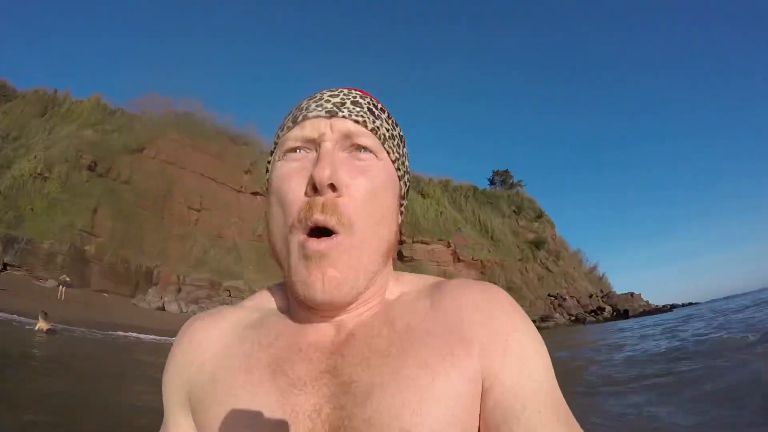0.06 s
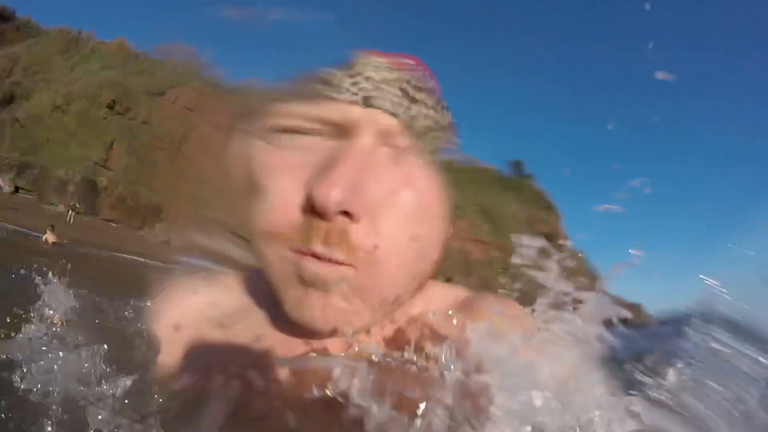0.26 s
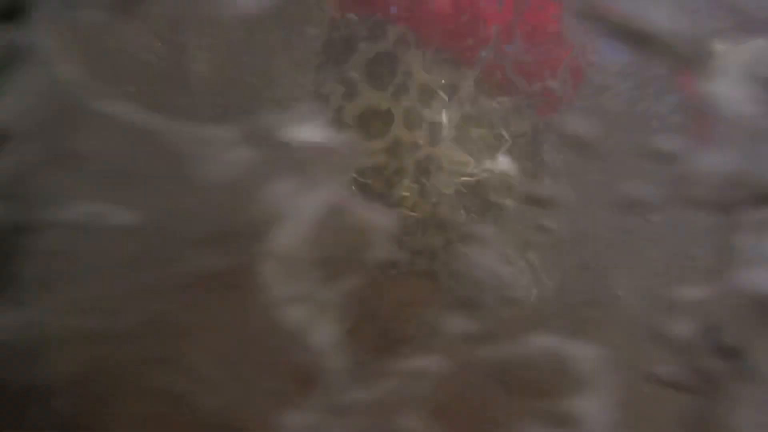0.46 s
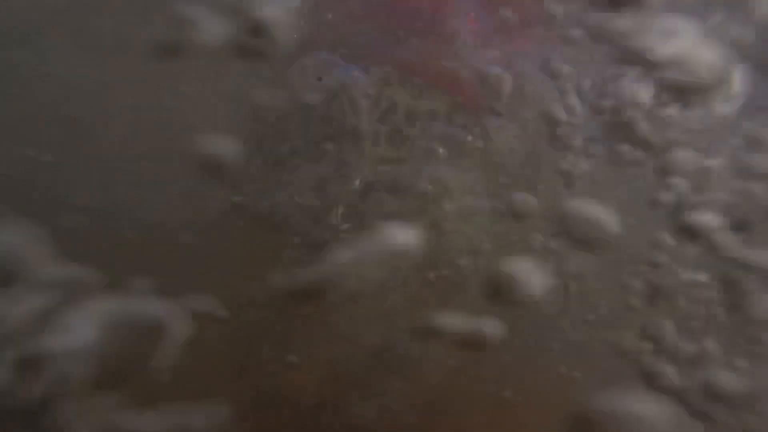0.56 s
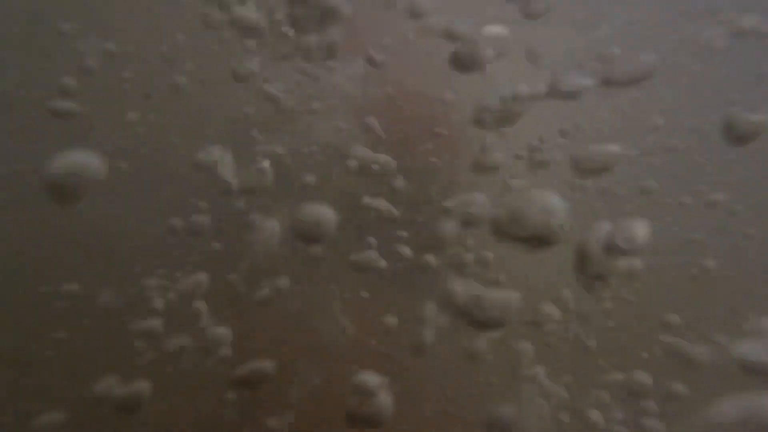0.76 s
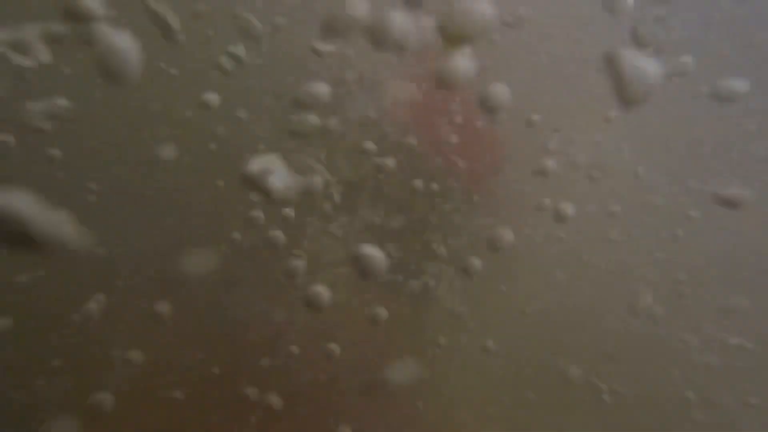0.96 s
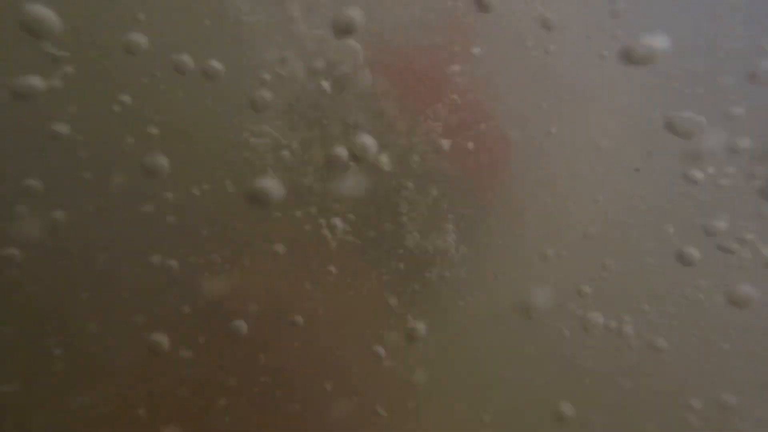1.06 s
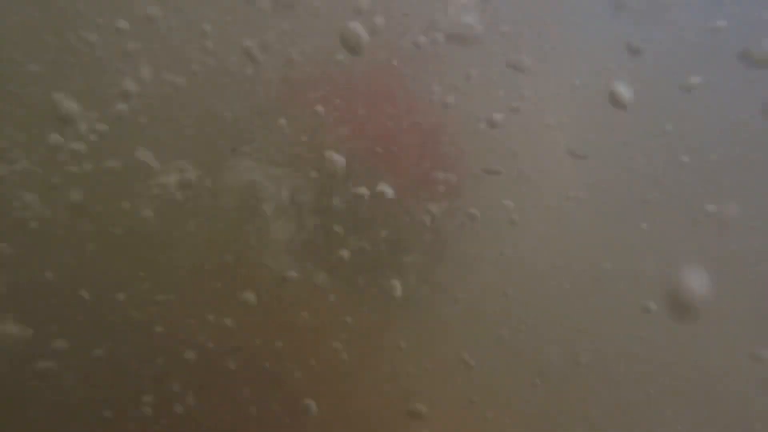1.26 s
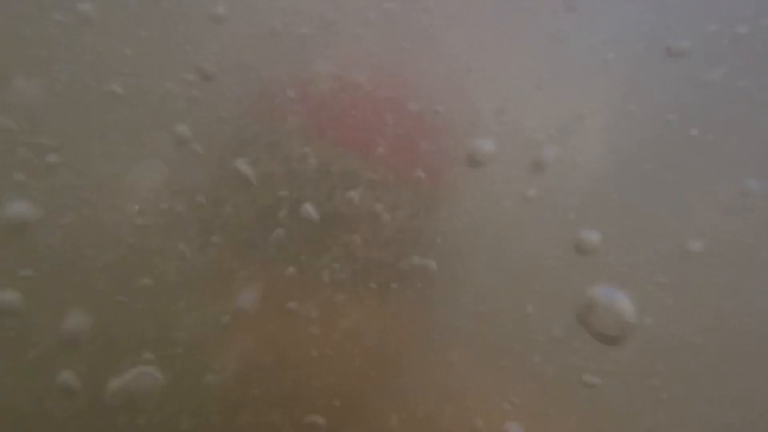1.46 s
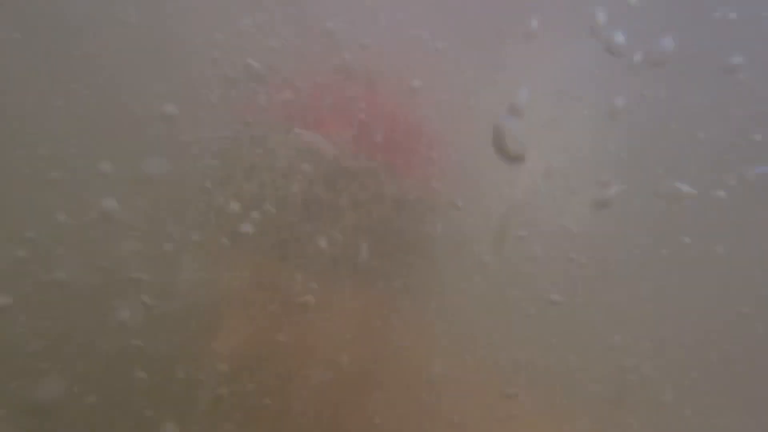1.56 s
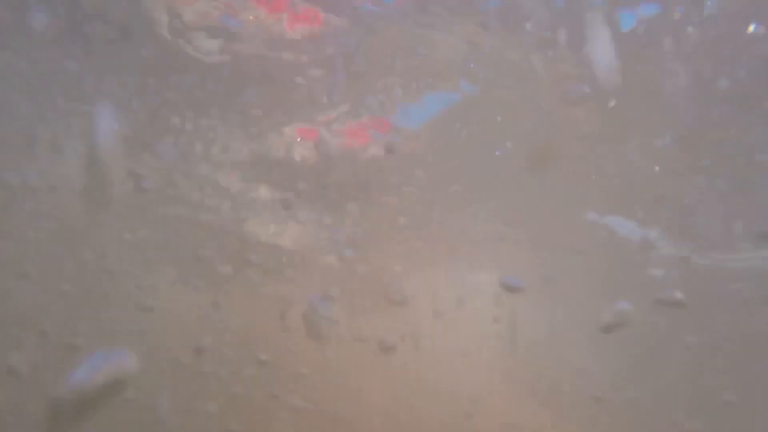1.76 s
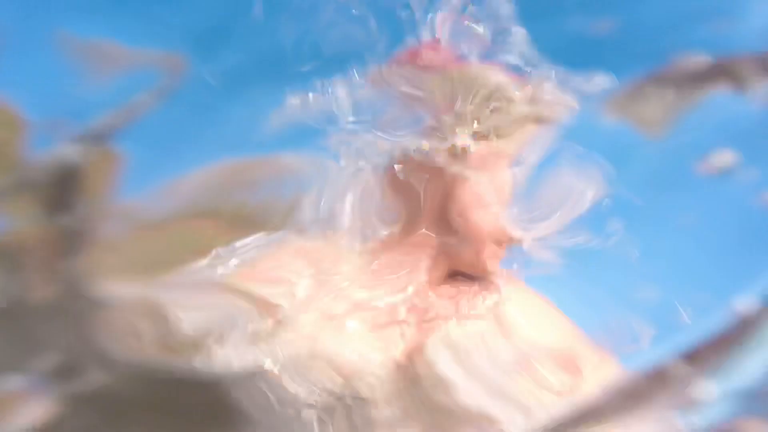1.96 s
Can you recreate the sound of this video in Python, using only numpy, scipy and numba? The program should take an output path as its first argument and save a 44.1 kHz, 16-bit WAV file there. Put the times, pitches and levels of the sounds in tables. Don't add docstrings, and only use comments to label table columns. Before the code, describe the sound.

A waterproof camera dips into the sea. Until 0.43 s, low wind rumble and thin spray hiss, with puffs around 0.26-0.37 s. At 0.43-0.58 s a bright splash, with drops, plops and hard slaps, the strongest near 0.55 s. Then muffled low gurgles, a wavering bubble hum and soft thuds until 1.5 s. Bubbles grow busier, and bright watery pops and light spray mark surfacing from 1.8 to 2 s.

```python
import sys
import numpy as np
from scipy import signal
from scipy.fft import rfft, irfft
from scipy.io import wavfile
from scipy.ndimage import uniform_filter1d
from numba import njit

SR = 44100
rng = np.random.default_rng(int(sys.argv[2]) if len(sys.argv) > 2 else 0)


def to_wav(sig):
    pcm = np.clip(np.atleast_2d(sig), -1, 1) * 32767
    pcm = np.round(pcm).astype(np.int16)
    wavfile.write(sys.argv[1], SR, pcm.T)


def volts(x):
    e = np.asarray(x, float) / 20
    return 10 ** e


N = 88993
TIME_S = np.arange(N) / SR
PLUNGE_S, UNDER_S, SURFACE_S = .433, .59, 1.86


def unit(x):
    return x / np.sqrt(np.mean(x ** 2))


def curve(table, column):
    rows = np.array(table, float)
    return np.interp(TIME_S, rows[:, 0], rows[:, column])


def colour_db(table, hz):
    rows = np.array(table, float)
    return np.interp(np.log(hz), np.log(rows[:, 0]), rows[:, 1], left=-90, right=-90)


def noise(table):
    hz = np.fft.rfftfreq(N, 1 / SR) + 1e-3
    spectrum = rfft(rng.standard_normal(N))
    return unit(irfft(spectrum * volts(colour_db(table, hz)), N))


def band_noise(low_hz, high_hz):
    b, a = signal.butter(2, [low_hz, high_hz], "band", fs=SR)
    return unit(signal.lfilter(b, a, rng.standard_normal(N)))


@njit
def ring(out, start_s, size, hz, t60_s, rise_cycles, glide):
    for k in range(len(start_s)):
        first, length, phase = int(start_s[k] * SR), int(t60_s[k] * SR), 0.
        for i in range(min(length, len(out) - first)):
            age = i / length
            phase += 2 * np.pi * min(hz[k] * (1 + glide * age), .45 * SR) / SR
            swell = 1 - np.exp(-(i * hz[k] / (rise_cycles * SR)) ** 2)
            out[first + i] += size[k] * np.sin(phase) * np.exp(-np.log(1000.) * age) * swell
    return out


def bubbles(table, gain_db, rise_cycles, glide, swarm_db, t60_s=None, count=12):
    swarm_oct, swarm_s, scatter_db = .584, .006, 2.8
    rows = np.array(table, float).T.copy()
    start_s, db, hz = rows[:3]
    if t60_s is None:
        t60_s = np.clip(rows[3], .006, .022)
    else:
        t60_s = np.full(len(start_s), t60_s)
    main = ring(np.zeros(N), start_s, volts(db + gain_db), hz, t60_s, rise_cycles, glide)

    late = rng.exponential(size=(len(start_s), count))
    g = rng.standard_normal((len(start_s), count, 2))
    ratio = 2 ** (swarm_oct * np.clip(g[..., 0], -.5, 1.4))
    small_s = start_s[:, None] + swarm_s * late
    small_size = volts(db[:, None] + swarm_db + scatter_db * (g[..., 1] - late)) / ratio
    small_hz = np.minimum(hz[:, None] * ratio, 13e3)
    small_t60_s = 0.66 * t60_s[:, None] / np.sqrt(ratio)
    swarm = ring(np.zeros(N), small_s.ravel(), small_size.ravel(), small_hz.ravel(),
                 small_t60_s.ravel(), rise_cycles, glide)
    return main + swarm


# time in seconds, level in dB.
PUSH_LEVEL = [(0, -24.5), (.012, -6.5), (.2, -7.5), (.3, -4.5), (.47, -8.5), (.6, -26), (.9, -27),
              (1.15, -24), (1.35, -20), (1.5, -17.5), (1.6, -8), (1.72, -16.5), (1.88, -12), (2.0, -4.5),
              (2.018, -17.5)]
# frequency in Hz, density in dB per Hz.
PUSH_SPECTRUM = [(4, -17.5), (11, 4), (22, -2), (40, -14.5), (120, -38.5), (300, -64)]


def push():
    swirl_db, air_swirl_db, swirl_hz, buffet_db = -33, -43, 111, -38
    heave = noise(PUSH_SPECTRUM)
    slow_rms = np.sqrt(uniform_filter1d(heave ** 2, size=6000) + 0.028)
    sway = heave / slow_rms * volts(curve(PUSH_LEVEL, 1))
    in_air = (TIME_S < PLUNGE_S) | (TIME_S > SURFACE_S)
    swirl_level = volts(np.where(in_air, air_swirl_db, swirl_db)) + volts(buffet_db) * sway ** 2
    return sway + swirl_level * band_noise(swirl_hz / 2, swirl_hz * 2)


# centre in seconds, level in dB.
GUST_EVENTS = [
    (.015, -35),
    (.06, -29.5),
    (.258, -20),
    (0.316, -21),
    (0.367, -15),
    (1.589, -33),
]
# frequency in Hz, density in dB per Hz.
GUST_SPECTRUM = [(25, 3), (60, -1.5), (150, -10.5), (400, -25), (1000, -55)]


def gusts():
    width_s = .011
    swells = sum(volts(db) * np.exp(-((TIME_S - s) / width_s) ** 2) for s, db in GUST_EVENTS)
    return noise(GUST_SPECTRUM) * swells


# time in seconds, level in dB.
SPRAY_LEVEL = [(0, -32), (.045, -34.5), (.06, -36), (.2, -38.5), (.26, -27.5), (.39, -35.5), (.43, -32),
               (.57, -36.5), (.6, -47), (.73, -46.5), (.75, -71.5), (1.1, -72.5), (1.4, -67), (1.55, -63.5),
               (1.8, -57.5), (1.82, -48.5), (2.02, -41.5)]
# frequency in Hz, density in dB per Hz.
SPRAY_SPECTRUM = [(900, -10.5), (1900, -7.5), (2500, -3.5), (4000, -10.5), (7800, -18.5), (8600, -22),
                  (13500, -25), (15600, -48)]


def spray(count=3000):
    far_fizz_db, fizz_db, hiss_db, fizz_cycles, scatter_db = -11, 4, -10, 47, 2
    wet_port_hz, wet_port_db, dry_port_db = 7400, -33, -8.5
    before = TIME_S < PLUNGE_S
    plunge = (TIME_S > PLUNGE_S) & (TIME_S < UNDER_S)

    u = rng.random((count, 3)).T
    hz = 900 * 17. ** u[1]
    db = colour_db(SPRAY_SPECTRUM, hz) + 10 * np.log10(hz) - scatter_db * np.log(.03 + u[2])
    fizz = unit(ring(np.zeros(N), u[0] * N / SR, volts(db), hz, fizz_cycles / hz, 0.95, 0.42))
    fizz = fizz * volts(np.where(before, far_fizz_db, fizz_db))
    both = fizz + volts(hiss_db) * noise(SPRAY_SPECTRUM)

    dull = signal.sosfiltfilt(signal.butter(6, wet_port_hz, fs=SR, output="sos"), both)
    top_db = np.where(plunge, 0, np.where(before, dry_port_db, wet_port_db))
    return (dull + (both - dull) * volts(top_db)) * volts(curve(SPRAY_LEVEL, 1))


# time in seconds, large bubbles in dB, middle bubbles in dB, large pitch in Hz.
CHURN_COURSE = [
    (.42, -51.5, -44.5, 341.2),
    (.47, -25.5, -35, 394),
    (.6, -34.5, -34.5, 249.7),
    (.8, -34, -34.5, 259.3),
    (.92, -27, -38, 321.4),
    (1.2, -24.5, -38, 298.6),
    (1.45, -33, -38.5, 307.7),
    (1.7, -32.5, -30.5, 307),
    (1.82, -26.5, -27, 343.2),
    (1.95, -42, -37, 330.5),
]


def gurgle(size, count):
    spread_oct, cycles = (0.2355, 0.3005)[size], (28, 36)[size]
    scatter_db, tilt_db_per_oct, middle_ratio = 5, -6.5, 2.1
    u = rng.random((count, 2)).T
    octs = spread_oct * np.clip(rng.standard_normal(count), -2, 1.3)
    centre_hz = curve(CHURN_COURSE, 3)[(u[0] * N).astype(int)] * middle_ratio ** size
    hz = centre_hz * 2 ** octs
    db = tilt_db_per_oct * octs - scatter_db * np.log(0.044 + u[1])
    crowd = unit(ring(np.zeros(N), u[0] * N / SR, volts(db), hz, cycles / hz, 0.8, 0.52))
    return crowd * volts(curve(CHURN_COURSE, size + 1))


# time in seconds, pitch in Hz, level in dB.
POCKET_COURSE = [
    (.6, 229.9, -61),
    (.635, 239.7, -22),
    (.69, 246.9, -30),
    (.725, 273.7, -27),
    (.75, 264.4, -41.5),
    (.79, 243.8, -29.5),
    (.83, 276, -36.5),
    (.88, 321.3, -22.5),
    (.9, 329, -45.5),
]


def pocket():
    wobble, flutter_db = 0.023, 3
    drift = []
    for _ in range(2):
        smooth = uniform_filter1d(rng.standard_normal(N), size=700)
        drift.append(unit(uniform_filter1d(smooth, size=700)))
    hz = curve(POCKET_COURSE, 1) * (1 + wobble * drift[0])
    phase = 2 * np.pi * np.cumsum(hz) / SR
    inside = (TIME_S > POCKET_COURSE[0][0]) & (TIME_S < POCKET_COURSE[-1][0])
    level = volts(curve(POCKET_COURSE, 2) + flutter_db * drift[1])
    return np.sqrt(2) * inside * np.sin(phase) * level


# start in seconds, peak in dB, pitch in Hz.
TICK_EVENTS = [(.257, -41, 8600), (.4155, -27, 6690), (.4336, -22, 8940), (.463, -15, 5430),
               (.49, -17.5, 5800), (.501, -25, 7100), (.531, -27.5, 5700), (.552, -17, 4990),
               (.646, -45, 6250), (.69, -36, 11150), (.756, -42.5, 5600), (1.459, -58, 10000),
               (1.499, -47, 6200), (1.556, -45.5, 11800), (1.567, -32, 5560), (1.59, -32.5, 5060),
               (1.638, -35, 5160), (1.729, -44, 14200), (1.874, -25, 4840), (2.012, -34, 9700)]


def ticks():
    return bubbles(TICK_EVENTS, 5.5, 1.2, 0.19, -10.5, 0.0074)


# start in seconds, peak in dB.
CRACK_EVENTS = [
    (.1346, -33.5),
    (0.2587, -31),
    (0.36, -38),
    (0.38, -34),
    (.4336, -11.5),
    (0.6691, -47),
    (1.4593, -41.5),
    (1.7285, -42),
    (2.012, -30.5),
]


def cracks():
    decay_s = .0006
    bursts = sum(volts(db) * (TIME_S > s) * np.exp(-np.abs(TIME_S - s) / decay_s) for s, db in CRACK_EVENTS)
    return band_noise(2960, 10000) * bursts


# start in seconds, peak in dB,
# pitch in Hz.
DEEP_EVENTS = [(.859, -19, 1232), (.861, -32.5, 1970), (.89, -46, 3330), (.93, -37, 2120),
               (.995, -38.5, 2110), (1.429, -39, 2360), (1.453, -38.5, 3900), (1.47, -38.5, 2550),
               (1.487, -38, 3400), (1.52, -31, 2490), (1.532, -32.5, 4500), (1.59, -32.5, 3380),
               (1.605, -27.5, 3200), (1.776, -33.5, 3470), (1.826, -37, 4400), (1.85, -30, 3380),
               (1.863, -16, 2510), (1.902, -17.5, 3590), (2.005, -13, 2480), (.7553, -33, 2170),
               (.778, -41, 2120), (.9494, -41, 1980), (1.202, -46, 2030), (1.2272, -48, 2540),
               (.64, -20, 1270), (.706, -20.5, 1040), (.688, -34.5, 3000), (1.714, -27.5, 1130),
               (1.665, -34.5, 3090), (1.812, -22.5, 2900)]


def deep_pings():
    return bubbles(DEEP_EVENTS, 0.5, 1.3, 0.046, -7.5, 0.016)


# start in seconds, peak in dB, pitch in Hz, ring T60 in seconds.
PING_EVENTS = [(0.1343, -24.5, 2780, 0.017), (0.3583, -24, 2830, 0.034), (0.4106, -24.5, 4520, 0.011),
               (0.4344, -10.5, 3540, 0.009), (0.437, -11, 2540, 0.009), (0.4498, -28, 4560, 0.009),
               (0.4543, -15.5, 4300, 0.009), (0.4405, -15, 1420, 0.012), (0.473, -15, 2600, 0.012),
               (0.481, -11.5, 2650, 0.01), (0.4905, -23.5, 2770, 0.008), (0.557, -13.5, 2760, 0.0094),
               (0.5312, -30, 2640, 0.012), (0.5493, -3, 1380, 0.0081), (0.63, -26.5, 2730, 0.013),
               (0.6749, -14.5, 2700, 0.006), (0.6909, -26, 1960, 0.0073), (0.7191, -20.5, 2065, 0.017),
               (1.5682, -12.5, 1980, 0.0098), (1.631, -23, 1850, 0.0084), (1.6628, -23, 1980, 0.019),
               (1.7342, -15.5, 2730, 0.0079), (1.7431, -20, 2315, 0.047), (1.8146, -9.5, 1610, 0.006),
               (1.8375, -17, 1510, 0.027), (1.8791, -17, 1870, 0.052), (1.8926, -13.5, 2170, 0.046),
               (1.9056, -7.5, 1840, 0.012), (1.9152, -5.5, 2230, 0.015), (1.935, -7.5, 2473, 0.025),
               (1.9752, -12.5, 3720, 0.0099), (1.9887, 0, 1870, 0.0062)]


def pings():
    return bubbles(PING_EVENTS, 2.0, 0.61, 0.072, -14.5)


# start in seconds, peak in dB, pitch in Hz.
THUD_EVENTS = [
    (.66, -28, 119.4),
    (.856, -22.5, 210),
    (.909, -25.5, 192),
    (1.019, -12.5, 123.7),
    (1.235, -24, 142.4),
    (1.31, -23.5, 117),
    (1.348, -15.5, 138),
    (1.578, -18.5, 199),
    (1.625, -21, 155),
    (1.69, -18.5, 168),
]


def thuds():
    return bubbles(THUD_EVENTS, 3.1, 0.5, 0.05, -9.5, 0.09, count=2)


# start in
# seconds, peak in dB, pitch in Hz.
PLOP_EVENTS = [(0.473, -4, 978), (0.481, 1.5, 762), (0.488, 2.5, 781), (0.4952, -15, 747), (0.503, -7, 954),
               (0.528, 1, 458), (0.992, -29.5, 697), (1.064, -31.5, 931), (1.159, -17, 644),
               (1.319, -19.5, 587), (1.357, -16.5, 551), (1.404, -18, 597), (1.443, -22.5, 638),
               (1.756, -14.5, 700), (1.77, -10, 628), (1.813, -6.5, 644), (1.8395, -7.5, 712),
               (1.855, -9.5, 695), (1.896, -16.5, 611), (.716, -21.5, 666), (.805, -33, 889),
               (1.105, -26, 580), (1.196, -14.5, 542), (1.197, -32, 796), (1.445, -27, 877),
               (1.455, -32, 1006), (1.585, -16, 508), (.63, -27, 744), (1.91, -22.5, 715)]


def plops():
    t60_s = np.where(np.array(PLOP_EVENTS)[:, 0] < UNDER_S, .024, .05)
    return bubbles(PLOP_EVENTS, 3.2, 1.83, 0.12, -6.0, t60_s, count=3)


# start in seconds, peak in dB, pitch in Hz.
GULP_EVENTS = [(0.633, -26, 247), (0.714, -16, 268), (0.883, -17, 343), (0.917, -7.5, 311.5),
               (0.938, -14.5, 385.5), (1.039, -7, 337.5), (1.104, -16.5, 494), (1.167, -8, 302),
               (1.193, -11.5, 265), (1.318, -23, 314), (1.353, -16, 337), (1.379, -13.5, 333),
               (1.51, -7, 408.4), (1.526, -10.5, 469), (1.584, -15, 328), (1.636, -11, 393),
               (1.783, -4.5, 352), (1.8, -7, 365), (1.295, -20.5, 342), (1.445, -24.5, 365),
               (1.495, -11.5, 276), (1.53, -16, 244), (.965, -14.5, 293)]


def gulps():
    return bubbles(GULP_EVENTS, 1.2, 0.59, 0.35, -5.5, 0.075, count=3)


# start in seconds, peak in dB, push length in seconds.
SLAP_EVENTS = [
    (.121, -17, 0.0018),
    (0.478, -2.5, 0.0012),
    (0.5244, -8.5, 0.0038),
    (0.55, 2.5, 0.00098),
    (0.564, 3, 0.0024),
]


def slaps():
    out = np.zeros(N)
    for start_s, db, width_s in SLAP_EVENTS:
        age = (TIME_S - start_s) / width_s
        dent = np.exp(-((age - 0.63) / 0.5) ** 2)
        rebound = 0.9 * np.exp(-((age - 1.49) / 0.25) ** 2)
        out += volts(db) * (rebound - dent)
    return out


def scene():
    flow = push() + gusts() + spray()
    churn = gurgle(size=0, count=500) + gurgle(size=1, count=1200)
    small = ticks() + cracks() + deep_pings() + pings()
    large = pocket() + thuds() + plops() + gulps()
    return (flow + churn + small + large + slaps())[None]


def low_pass(x):
    return signal.sosfilt(signal.butter(12, 15820, fs=SR, output="sos"), x)


def record(dry):
    membrane_hz = 13000
    rounded = np.tanh(1.149 * dry) / 1.251
    dull = signal.sosfilt(signal.butter(4, membrane_hz, fs=SR, output="sos"), rounded)
    return low_pass(dull)


dry = scene()
out = record(dry)
to_wav(out)
```